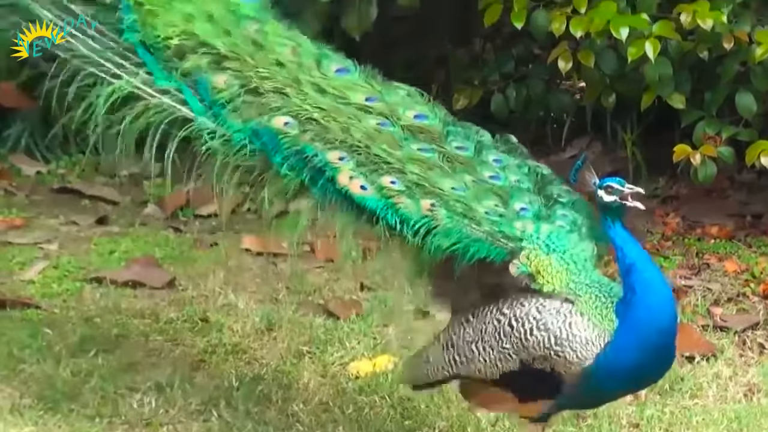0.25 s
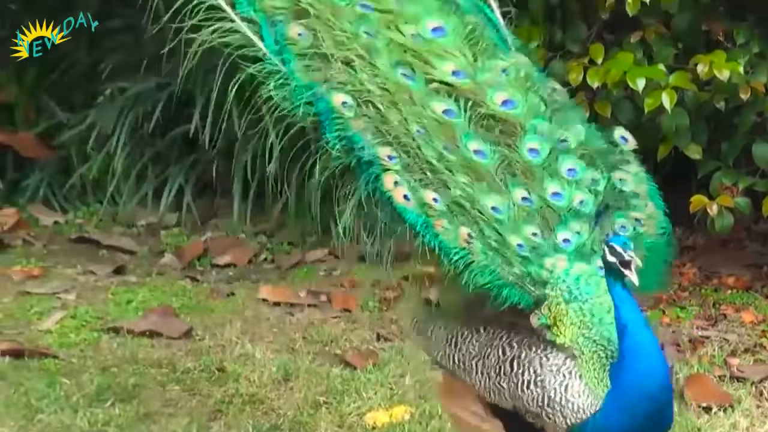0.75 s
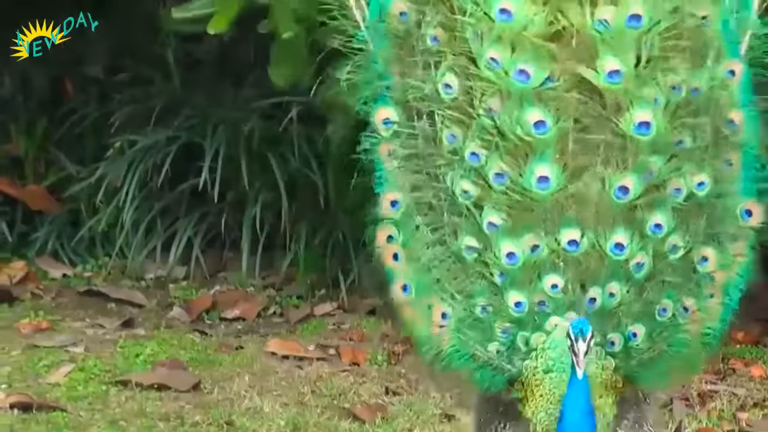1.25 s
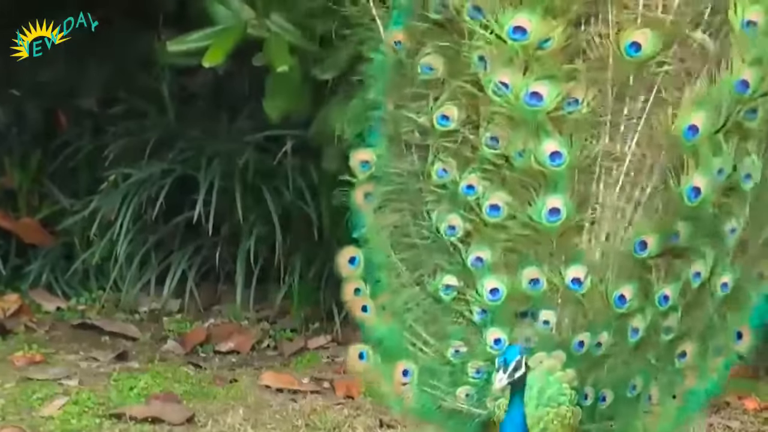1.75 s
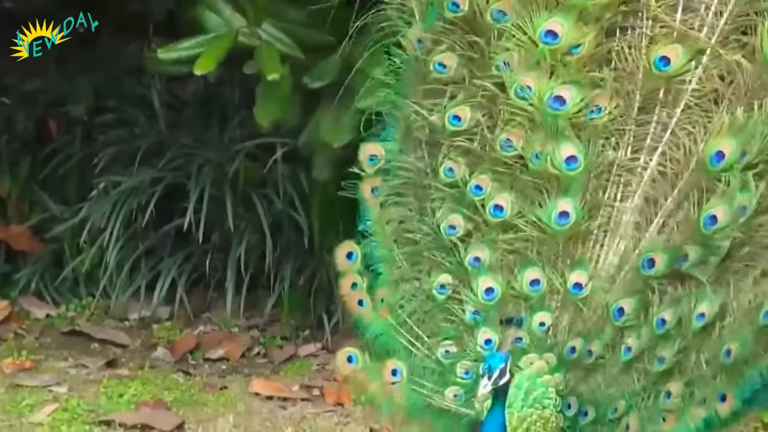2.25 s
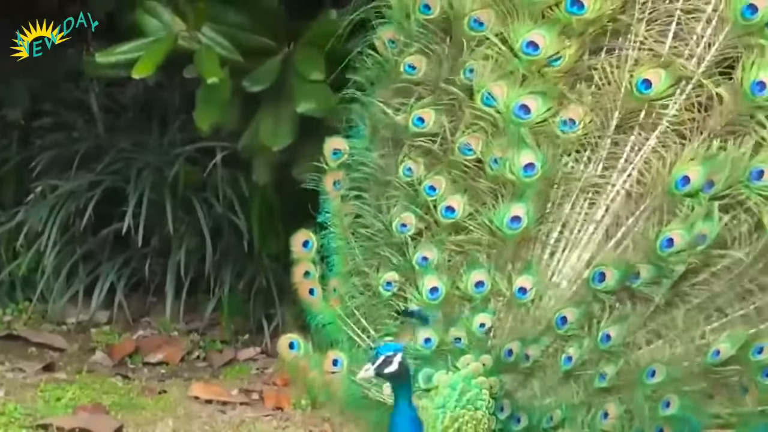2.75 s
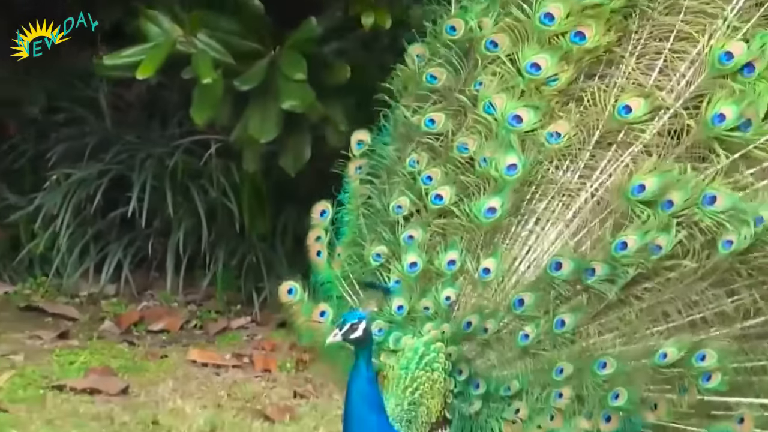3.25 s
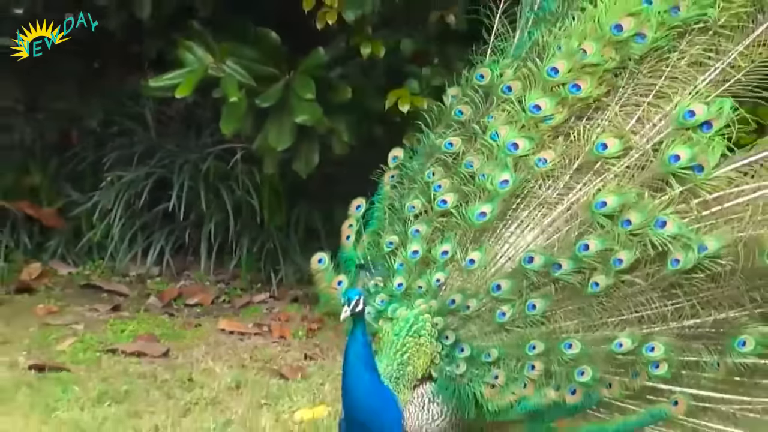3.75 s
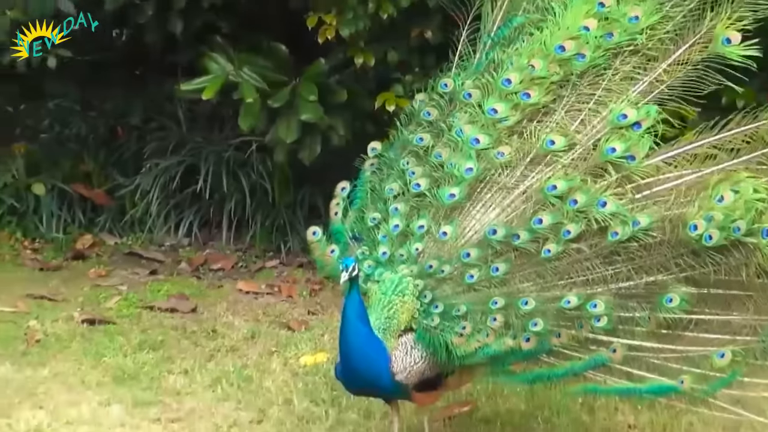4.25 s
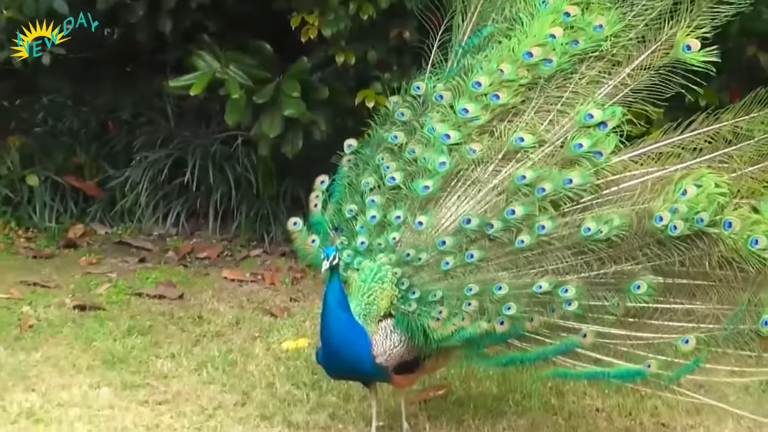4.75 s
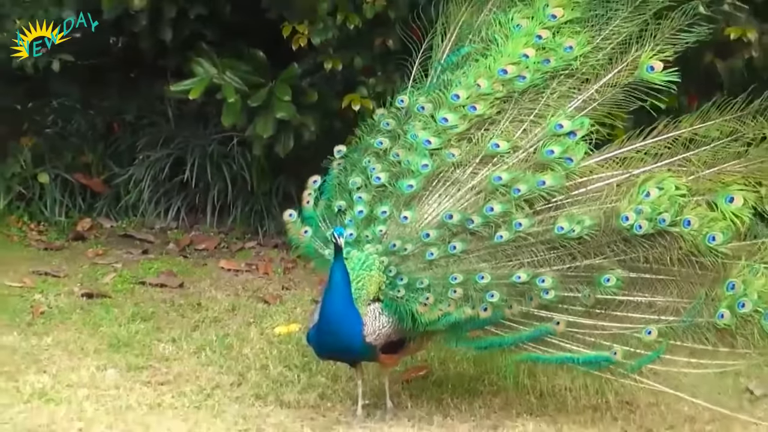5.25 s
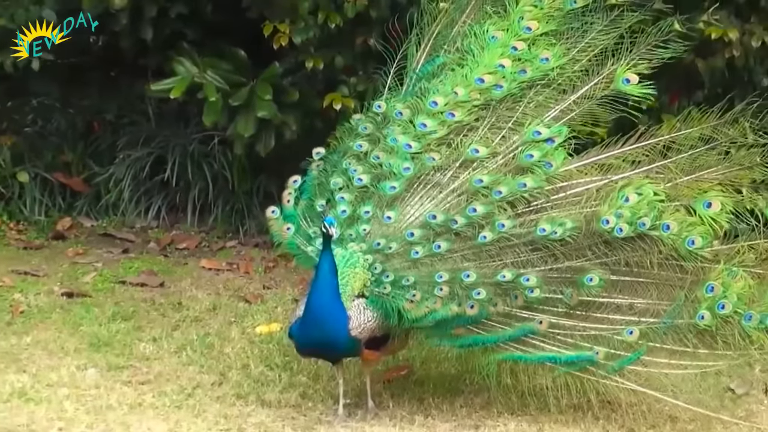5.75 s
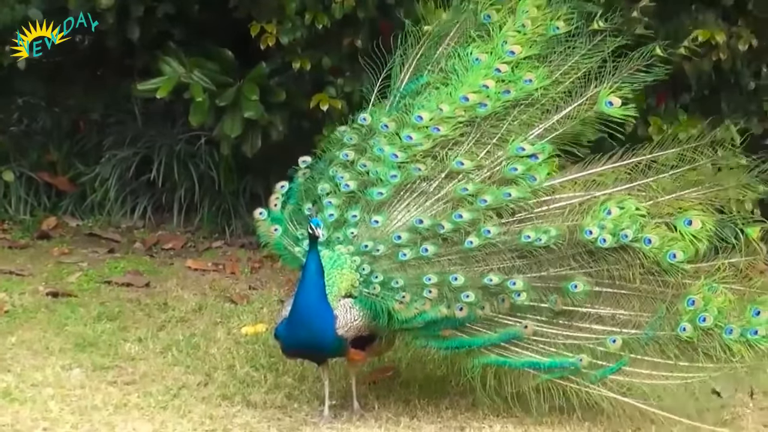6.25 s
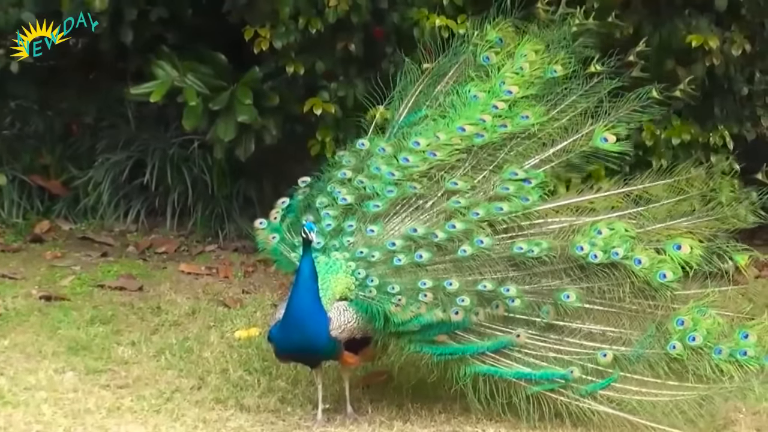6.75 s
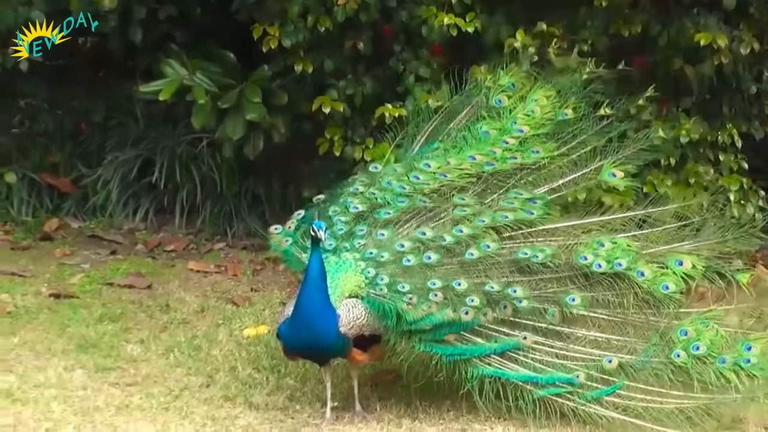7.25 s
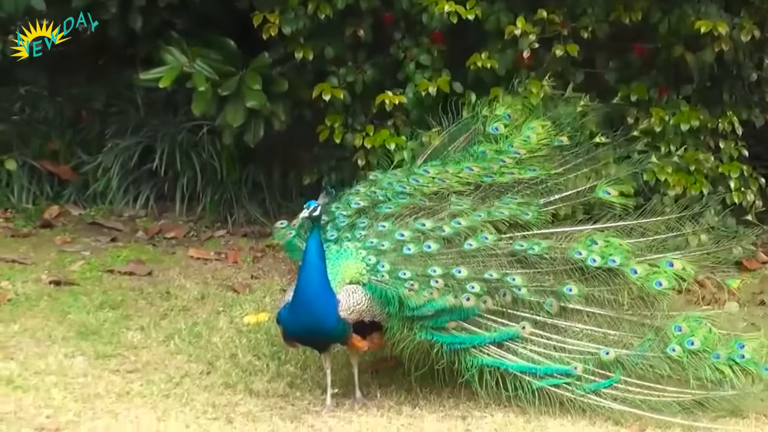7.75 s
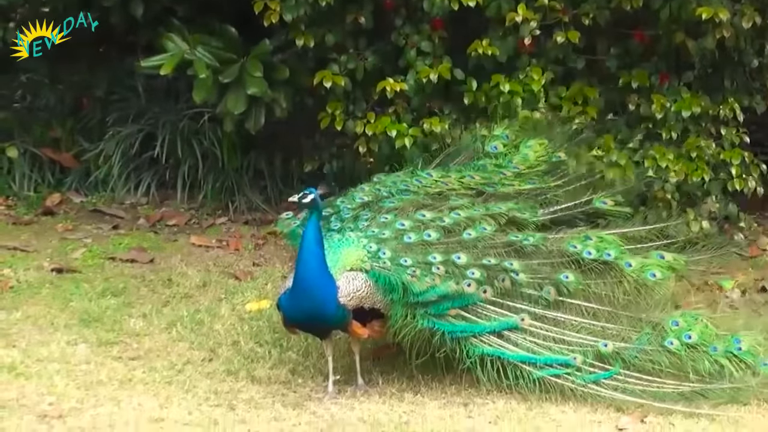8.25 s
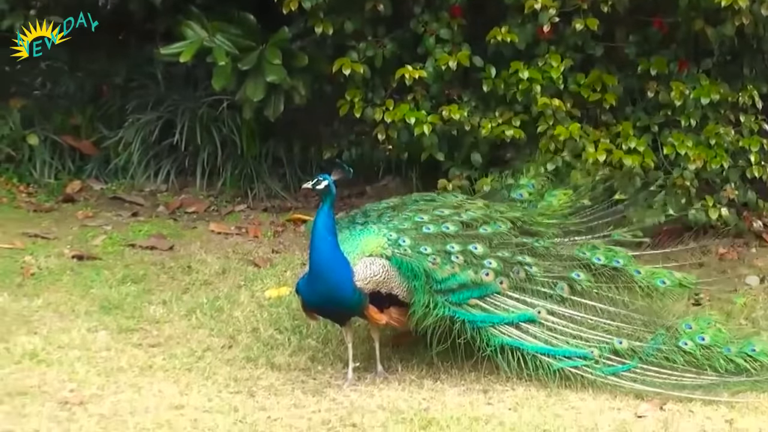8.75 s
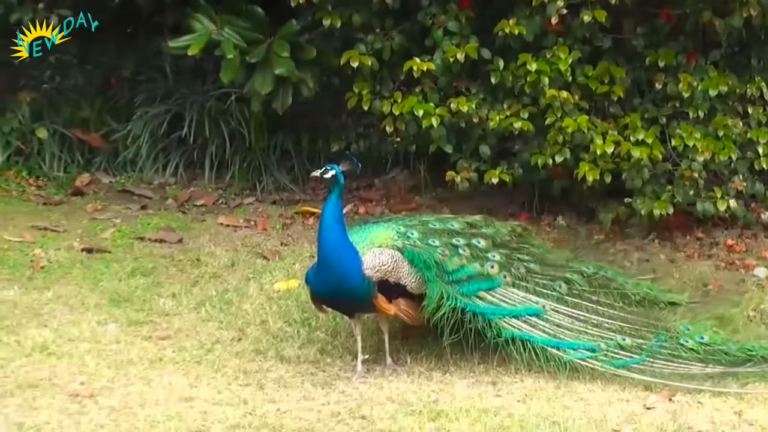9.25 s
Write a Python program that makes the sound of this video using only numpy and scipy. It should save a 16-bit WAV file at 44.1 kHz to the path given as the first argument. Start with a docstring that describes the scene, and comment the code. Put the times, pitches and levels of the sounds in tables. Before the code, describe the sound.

Two loud, nasal peacock honks ring across a lawn while small birds chirp and whistle, insects buzz, and feathers later swish down softly.

```python
"""Two arched peacock honks ring out on a lawn, and later its train swishes down.
Small birds chirp, whistle and peep in the hedge, over a thin ticking trill and a throbbing cicada that fades.
Below lie a far insect chorus and a low outdoor rumble.
Honks are stacks of harmonics shaped by a throat; birds are bending sine tones with leafy echoes.
The swish, cicada hiss, chorus and rumble are shaped noise; the cicada adds a throbbing buzz."""
import sys
import numpy as np
from scipy import signal
from scipy.fft import rfft, irfft
from scipy.io import wavfile
from scipy.ndimage import uniform_filter1d

SR = 44100
rng = np.random.default_rng(int(sys.argv[2]) if len(sys.argv) > 2 else 0)


def master_out(mix):
    """Clip the mix to full scale and print it as 16-bit PCM to the path in sys.argv[1]."""
    frames = np.transpose(np.atleast_2d(mix))
    ceiling = np.clip(frames, -1, 1)
    pcm = np.round(ceiling * 32767).astype(np.int16)
    wavfile.write(sys.argv[1], SR, pcm)


N = 418509
TIME = np.arange(N) / SR


def peacock(flutter=0.0035, flutter_hz=80, jitter=0.002, shimmer=0.048, rasp_db=-10, rasp_hz=11500):
    """Fluttering pulses ring the throat; each harmonic flares as the arch carries it across a resonance."""
    # the honks: start [t/s], length [t/s], start, top and end pitch [f/Hz], effort [level/dB], release [t/s]
    honks = [(0.168, 0.3966, 611.3, 723.8, 576, -27.5, 0.0065),
             (0.816, .439, 597, 731.3, 637, -26.5, 0.0016)]
    # pitch and effort share one arch: place of its top (share of the length), steepness of its two sides
    top_place, rise_power, fall_power = 0.48, 2.0, 2.4
    # effort at the two feet, relative to the top, and the time the voice takes to start
    start_effort_db, end_effort_db, attack_s = -5.5, -6, 0.01
    # on the way down the voice narrows: loss of the other harmonics, centre and width of what stays
    narrow_db, narrow_hz, narrow_width_hz = -2.5, 2510, 490
    end_flutter = 1.5  # extra unsteadiness at the end of a honk, as a multiple of the usual

    pulses, effort = np.zeros((2, N))
    wobble = flutter * waver(flutter_hz, 39) + jitter * waver(230, 160)
    tremor = 1 + shimmer * waver(63, 60)
    rasp = waver(rasp_hz, 4400)  # hoarse fizz among the top harmonics
    for start, length, start_hz, top_hz, end_hz, db, release_s in honks:
        t = np.arange(0, length, 1 / SR)
        at = round(start * SR) + np.arange(len(t))
        # both are 0 at the top of the arch and 1 at its feet
        rise = np.maximum(1 - t / length / top_place, 0) ** rise_power
        fall = np.maximum((t / length - top_place) / (1 - top_place), 0) ** fall_power
        hz = top_hz + (start_hz - top_hz) * rise + (end_hz - top_hz) * fall
        unsteady_hz = hz * (1 + wobble[at] * (1 + end_flutter * fall))
        phase = 2 * np.pi * np.cumsum(unsteady_hz) / SR

        loss_db = narrow_db * np.sqrt(fall)
        stack = np.zeros(len(t))
        for k in range(1, 26):
            outside = 1 - np.exp(-((k * hz - narrow_hz) / narrow_width_hz) ** 2)
            stack += amp(loss_db * outside) * np.cos(k * phase)
        # the rasp comes in puffs, one per pulse
        puffs = amp(rasp_db) * stack.std() * rasp[at] * (1 + np.cos(phase))
        pulses[at] = stack * tremor[at] + puffs
        effort_db = db + start_effort_db * rise + end_effort_db * fall
        effort[at] = amp(effort_db) * gate(t, length, attack_s, release_s)
    voice = irfft(rfft(pulses) * throat(np.fft.rfftfreq(N, 1 / SR)), N)
    return hedge(effort * voice, wet_db=-61, t60=0.32)


def throat(hz):
    """Fixed steep resonances strengthen some harmonics and delay them: gain and phase lag at each frequency."""
    # resonances that the harmonics sweep through: centre [f/Hz], width [f/Hz], strength [level/dB]
    resonances = [(721, 233, -16.5), (1274, 133, -6.4), (1919, 145, -4.1), (2171, 120, -2.7),
                  (2412, 178, -0.7), (2713, 106, -1.9), (3275, 179, -9.6), (3604, 68, -22.6),
                  (3795, 232, -22.5), (4334, 240, -24.2), (4697, 790, -32.0), (5878, 430, -40.6),
                  (6447, 154, -34.5), (7325, 4451, -46.1), (8518, 272, -39.1), (10123, 296, -39.1),
                  (10685, 466, -41.8), (13509, 9573, -48.4)]
    # narrow gaps between the resonances: centre [f/Hz], width [f/Hz], depth [level/dB]
    gaps = [(1490, 31, -7), (2880, 27, -3.5), (3510, 35, -1), (5130, 120, -5)]
    # brightness on top of the resonances: frequency [f/Hz], gain [level/dB]
    brightness = [(600, 0), (1400, 1), (2200, -0.5), (3300, 1), (4400, 0.5), (5000, 4), (6400, 3),
                  (8500, 3), (10500, 1), (15000, 4)]

    grid = np.fft.rfftfreq(4096, 1 / SR)
    power = sum(amp(db) ** 2 / (1 + ((grid - f) / width) ** 2) ** 4 for f, width, db in resonances)
    gaps_db = sum(db * np.exp(-((grid - f) / width) ** 2) for f, width, db in gaps)
    log_gain = np.log(np.sqrt(power + 1e-6) * amp(gaps_db + read(brightness, grid)))
    # this lag makes the resonances ring after each pulse, never before it
    mirrored = np.r_[log_gain, log_gain[-2:0:-1]]
    lag = signal.hilbert(mirrored).imag[:len(grid)]
    return np.exp(np.interp(hz, grid, log_gain - 1j * lag))


def train(grain_db=1.5):
    """Long feathers brush over each other as the fan folds: a dull push of air, then the rustle."""
    # rustle of the feathers: frequency [f/Hz], relative level per Hz [level/dB]
    feathers = [(200, -13), (600, 0), (1200, 2), (2600, -1.5), (4000, -3), (8000, -10), (15000, -43)]
    # one swish: quick attack, short hold (counted from the start), even decay
    start_s, level_db, attack_s, hold_s, fade_db_per_s = 8.292, -61.5, .018, .09, 55
    brightens_s = .06  # it starts dull; the treble takes this long to come in

    t = TIME - start_s
    db = level_db - fade_db_per_s * np.maximum(t - hold_s, 0)
    rustle = noise(feathers, patchy_db=1.5)
    dull = uniform_filter1d(rustle, size=14)
    opening = dull + np.clip(t / brightens_s, 0, 1) * (rustle - dull)
    grain = grain_db * waver(0, 120)
    return np.clip(t / attack_s, 0, 1) * amp(db + grain) * opening


def chirper(fizz_db=-9.98, fizz_hz=7500, scratch_hz=330):
    """One falling chirp of quick strokes with a scratchy start, repeated from deep in the leaves."""
    # the chirps: start [t/s], level [level/dB], brightness [dB per octave], pitch factor [1]
    chirps = [(1.353, -53.5, 3, .98), (4.429, -51.5, -8, 1), (5.15, -74, 11, 1.03),
              (5.622, -53, 1.5, 1.026), (6.17, -78, -5, 1.1), (6.389, -73, -8, 1.2),
              (7.071, -74.5, -17, 1.0), (7.492, -54.5, 0.5, 1.0), (8.96, -81, -7, 0.98),
              (9.101, -82, -3, 1.04), (9.334, -65, 7, 0.96)]
    # strokes of one chirp: delay [t/s], length [t/s], start, middle and end pitch before the pitch factor
    # [f/Hz], level relative to the chirp [level/dB], roughness [0-1]
    strokes = [(.012, .03, 5400, 5000, 4700, -9, 0.9), (.028, 0.0222, 3000, 4090, 3260, -2, 0.2),
               (.036, 0.015, 4700, 4640, 4130, -2, 0.55), (.046, .02, 3420, 3176, 3530, -1.5, 0.2),
               (.06, .024, 4600, 5100, 5400, -10, 1), (.066, 0.019, 3270, 3000, 3000, -5, 0.3),
               (0.086, .014, 3480, 3100, 2800, 2, .1), (.098, .032, 3000, 2878, 2600, -.5, .4)]
    pivot_hz = 3000  # strokes listed at this pitch keep their level whatever the brightness

    clean, rough, bright = np.zeros((3, N))
    for s, db, brightness_db, pitch in chirps:
        for delay, length, start_hz, middle_hz, end_hz, stroke_db, roughness in strokes:
            octaves = np.log2(middle_hz / pivot_hz)
            bend = arch(length, pitch * start_hz, pitch * middle_hz, pitch * end_hz, soft=0.27)
            stroke = amp(db + stroke_db + brightness_db * octaves) * bend
            share = np.clip(roughness, 0, 1)
            add(clean, s + delay, np.sqrt(1 - share ** 2) * stroke)
            add(rough, s + delay, share * stroke)
            add(bright, s + delay, octaves * stroke)  # strokes farther from the pivot pitch fizz more
    fizz_level = np.sqrt(abs(uniform_filter1d(bright ** 2, size=1200)))
    fizz = amp(fizz_db) * fizz_level * waver(fizz_hz, 4700)
    scratchy = rough * waver(scratch_hz, 300)
    return hedge(clean + scratchy + fizz, wet_db=-5, t60=.2)


def whistler(pan_db=-2, unsteady=0.0042):
    """Long sliding whistles, a little to the right: each glides, swells in, catches once and stops."""
    # notes near and far: start [t/s], length [t/s], start and settled pitch [f/Hz], level [level/dB],
    # time from note start to the catch [t/s], catch depth [level/dB]
    whistles = [(2.575, .425, 3683, 3328, -54.5, .13, -10), (3.07, .49, 2930, 3110, -66.5, .21, -17),
                (7.215, .45, 3670, 3406, -53.5, .14, -22), (7.775, .43, 3020, 3080, -63.5, .2, -22),
                (7.17, .26, 2220, 2350, -80.5, .17, -4), (7.9, 0.28, 2340, 2345, -80, .2, -5)]
    glide_s, attack_s, catch_width_s, release_s = .115, .055, .015, .035

    out = np.zeros(N)
    drift = 1 + unsteady * waver(6.8, 25)
    for start, length, start_hz, settled_hz, db, catch_s, catch_db in whistles:
        t = np.arange(0, length, 1 / SR)
        glide_hz = settled_hz + (start_hz - settled_hz) * np.exp(-t / glide_s)
        hz = glide_hz * drift[round(start * SR):][:len(t)]
        dip_db = catch_db * np.exp(-((t - catch_s) / catch_width_s) ** 2)
        level = amp(db + dip_db) * gate(t, length, attack_s, release_s) ** 2
        add(out, start, np.sqrt(2) * level * np.sin(2 * np.pi * np.cumsum(hz) / SR))
    wavering = out * (1 + 0.17 * waver(29, 32))
    echoing = hedge(wavering, wet_db=-13, t60=.6)
    return echoing * amp([[pan_db / 2], [-pan_db / 2]])


def peeper():
    """Very high contact calls: each is a thin arched tone with a fainter second voice above it."""
    # the peeps: start [t/s], length [t/s], start, top and end pitch [f/Hz], lower voice [level/dB],
    # upper voice relative to the lower [level/dB]
    peeps = [(4.655, 0.053, 6550, 7050, 7160, -59.5, -35), (8.203, .054, 2600, 5150, 2600, -57.5, -20),
             (8.28, .06, 7740, 8080, 7970, -66, -25), (8.39, .055, 7450, 7780, 7800, -68, -8.5),
             (8.597, 0.071, 7540, 7730, 7500, -61, -12), (8.786, 0.094, 7170, 7640, 7780, -61, -15.5)]
    upper_ratio = 1.255  # pitch of the upper voice over the lower

    out = np.zeros(N)
    for s, length, *pitches, db, upper_db in peeps:
        lower = arch(length, *pitches)
        upper = arch(length, *upper_ratio * np.array(pitches))
        add(out, s, amp(db) * (lower + amp(upper_db) * upper))
    return hedge(out, wet_db=-2, t60=0.21)


def trill(length=.024, start_hz=7500, top_hz=8100, end_hz=7200):
    """Tiny arched ticks, about ten a second, with short pauses between runs."""
    # the runs: middle of first tick [t/s], middle of last tick [t/s], average level [level/dB]
    runs = [(0.09, 0.776, -68), (0.89, 1.502, -66), (1.653, 2.926, -66), (3.022, 4.849, -67.5),
            (4.993, 5.941, -72), (6.063, 7.596, -69.5), (7.749, 9.452, -73.5)]
    tick_gap_s = .1035  # nearly: each run is divided evenly

    out = np.zeros(N)
    for first, last, db in runs:
        for s in np.linspace(first, last, round((last - first) / tick_gap_s) + 1):
            tick = arch(length, start_hz, top_hz, end_hz)
            add(out, s - length / 2, amp(db + rng.normal()) * tick)
    return hedge(out, wet_db=-16, t60=.1)


def cicada(buzz_hz=5900, width_hz=600, sharpness=4):
    """A broad hiss with a narrow buzz that throbs: it swells, holds, speeds up and dies away."""
    # the hiss: frequency [f/Hz], relative level per Hz [level/dB]
    hiss = [(1880, -30), (3200, -6), (3750, -14.5), (3950, -5.5), (4250, -6.5), (5180, -3.5), (5680, -1.5),
            (6030, -2), (6790, -5), (8120, -4), (10100, -20.5), (12900, -20.5), (15500, -31)]
    # level while it holds, swell before that, and the slow fade once it tires
    level_db, swell_db_per_s, full_s, tires_s, fade_depth_db, fade_s = -61, 3.5, 1.13, 3.67, -23.5, 3.44
    # the throb gathers pace as the cicada swells, holds its rate, then hurries before it stops
    throb_hz, warm_hz_per_s, hurries_s, hurry_hz_per_s = 14.06, 1.08, 4.15, 3.5
    # level of the throb relative to the hiss until it dies out, its end, and the length of that release
    throb_db, throb_ends_s, throb_release_s = -6, 5.9, 0.88

    warming_s = np.minimum(TIME - full_s, 0)
    tired_s = np.maximum(TIME - tires_s, 0)
    hurried_s = np.maximum(TIME - hurries_s, 0)
    swell_db = swell_db_per_s * warming_s
    fade_db = fade_depth_db * (1 - np.exp(-(tired_s / fade_s) ** 2))
    rate = throb_hz + warm_hz_per_s * warming_s + hurry_hz_per_s * hurried_s
    throb = unit(np.exp(-sharpness * np.cos(2 * np.pi * np.cumsum(rate) / SR)))
    throb *= np.clip((throb_ends_s - TIME) / throb_release_s, 0, 1)
    buzz = np.array([waver(buzz_hz, width_hz) for side in range(2)])
    body = noise(hiss, patchy_db=1.6) + amp(throb_db) * throb * buzz
    return amp(level_db + swell_db + fade_db) * body


def garden():
    """Low outdoor rumble and a far chorus of insects, both steady noise with shaped spectra."""
    # chorus and rumble: frequency [f/Hz], relative level per Hz [level/dB]
    insects = [(2350, -43), (4000, -41), (4280, -18), (4580, -1), (4910, -1), (5220, 3), (6020, -9),
               (6590, -7.5), (7380, -4), (7810, -2), (8170, 0.5), (8890, -0.5), (9360, -24.5), (12200, -17),
               (15500, -24)]
    air = [(11, -33), (18, -2.5), (80, 1.5), (133, -9), (172, -9.5), (231, -11), (278, -12.5), (327, -12.5),
           (358, -14.5), (542, -17), (859, -16.5), (2310, -28), (2910, -26.5), (4400, -29), (5720, -35),
           (9680, -120)]
    # course of the rumble: time [t/s], change from its starting level [level/dB]
    air_level = [(0, 0), (5, -.8), (8.3, -1.2), (9.49, -4)]
    chorus_db, air_start_db = -68.5, -58

    air_db = air_start_db + np.interp(TIME, *np.transpose(air_level))
    rumble = amp(air_db) * noise(air, patchy_db=1)
    chorus = amp(chorus_db) * noise(insects, patchy_db=1.5)
    return rumble + chorus


def noise(spectrum, patchy_db):
    """Stereo noise of rms 1 with a given spectrum, and patches of it that drift in level."""
    # likeness of left and right: frequency [f/Hz], likeness [0-1]
    likeness = [(60, 0.61), (110, 0.8), (200, 0.64), (380, 0.62), (700, 0.64), (1290, 0.68), (2380, 0.57),
                (4400, 0.47), (8120, 0), (15000, 0.88)]
    frames, hz = N // 512 + 5, np.fft.rfftfreq(2048, 1 / SR)
    a, b, c, d, patches = rng.standard_normal((5, frames, len(hz)))
    patches = uniform_filter1d(patches, size=7, axis=0)  # smooth over time
    patches = unit(uniform_filter1d(patches, size=20, axis=1))  # and over frequency
    same = np.clip(read(likeness, hz), 0, 1)
    left, other = a + 1j * b, c + 1j * d
    z = np.array([left, same * left + np.sqrt(1 - same ** 2) * other])
    z *= amp(read(spectrum, hz) + patchy_db * patches)
    sound = signal.istft(z.transpose(0, 2, 1), nperseg=2048, noverlap=1536)[1]
    return unit(sound[:, :N])


def hedge(x, wet_db, t60):
    """Direct sound plus sparse echoes scattered by leaves and trunks, dying by 60 dB in t60 seconds."""
    t = np.arange(SR * 3 // 4) / SR
    hits = rng.standard_normal((3, len(t))) * (rng.random((3, len(t))) < 1 / 20)
    taps = hits * amp(-60 * t / t60)
    taps = taps[:2] + 1.35 * taps[2]  # the third set reaches left and right alike
    taps /= np.linalg.norm(taps, axis=1, keepdims=True)
    return x + amp(wet_db) * signal.fftconvolve(x[None], taps, axes=1)[:, :N]


def arch(length, start_hz, top_hz, end_hz, soft=0.59):
    """A short whistle that bends through a middle pitch; soft is the share spent fading in and out."""
    u = np.linspace(-1, 1, int(length * SR))
    hz = top_hz + (np.where(u < 0, start_hz, end_hz) - top_hz) * u ** 2
    tone = np.sqrt(2) * np.sin(2 * np.pi * np.cumsum(hz) / SR)
    return tone * signal.windows.tukey(len(u), soft)


def waver(hz, width_hz):
    """Random wobble of rms 1 around a rate: noise kept only near that frequency."""
    f = np.fft.rfftfreq(N, 1 / SR)
    band = np.exp(-((f - hz) / width_hz) ** 2)
    return unit(irfft(rfft(rng.standard_normal(N)) * band, N))


def gate(t, length, attack_s, release_s):
    """Attack, hold and release of a sound that starts at t = 0."""
    return np.clip(t / attack_s, 0, 1) * np.clip((length - t) / release_s, 0, 1)


def add(mix, s, sound):
    """Mixes a sound in at s seconds."""
    part = mix[max(round(s * SR), 0):][:len(sound)]
    part += sound[:len(part)]


def read(points, hz):
    """A spectrum, joined by straight lines on a log frequency axis."""
    f, value = np.transpose(points)
    return np.interp(np.log(hz + 1), np.log(f + 1), value)


def amp(db):
    """Decibels to gain."""
    return 10 ** (np.asarray(db) / 20)


def unit(x):
    """Scales to rms 1."""
    return x / np.sqrt(np.mean(x ** 2) + 1e-20)


def scene():
    """All sources on and around the lawn."""
    birds = peacock() + train() + chirper() + whistler() + peeper()
    return birds + trill() + cicada() + garden()


def record(dry):
    """The recorder's band limit: a steep filter removes the highest treble."""
    edge_hz = 15700
    low_pass = signal.firwin(511, edge_hz, window=("kaiser", 9), fs=SR)
    return signal.oaconvolve(dry, low_pass[None], "same")


dry = scene()
out = record(dry)
master_out(out)
```